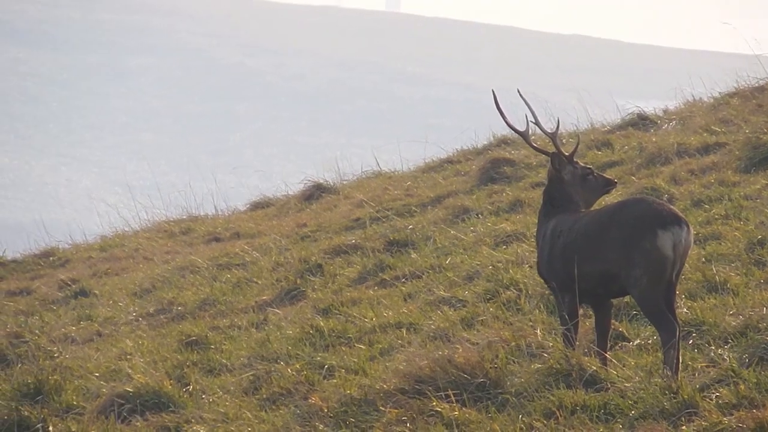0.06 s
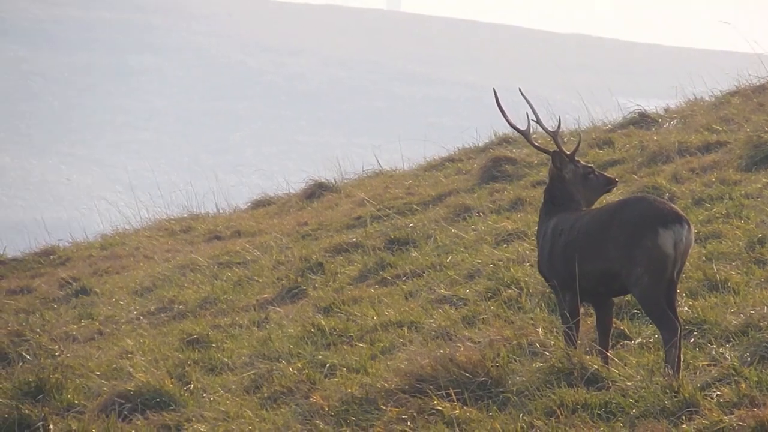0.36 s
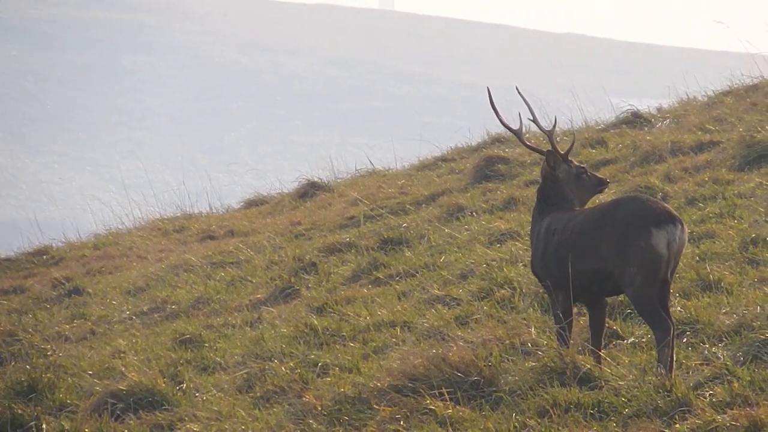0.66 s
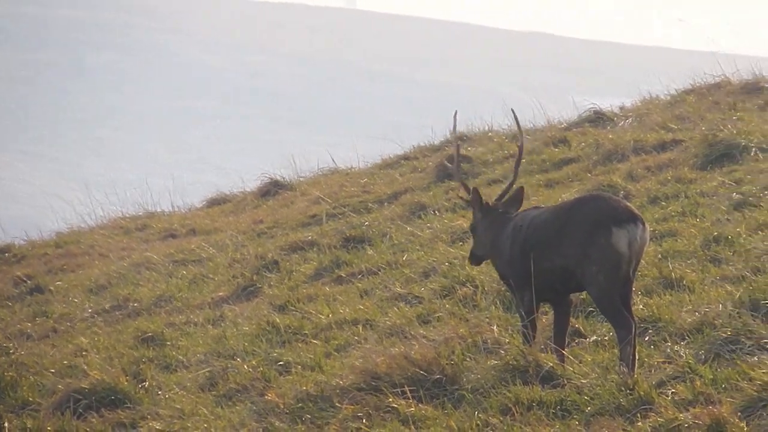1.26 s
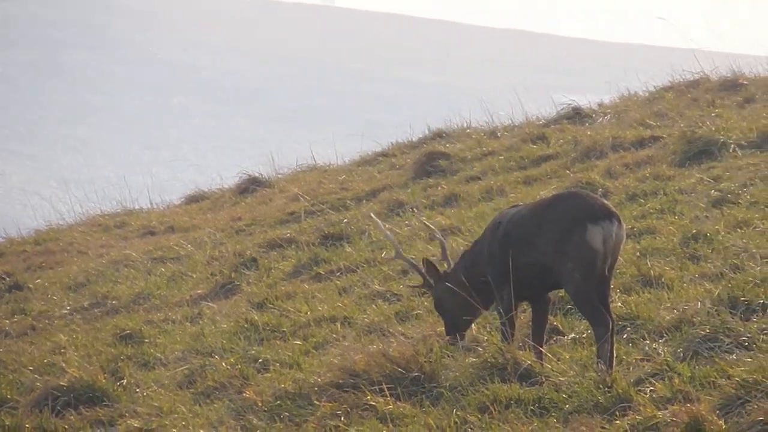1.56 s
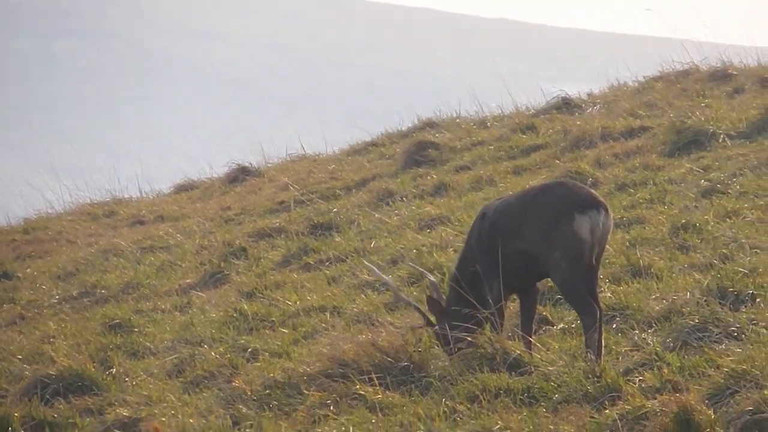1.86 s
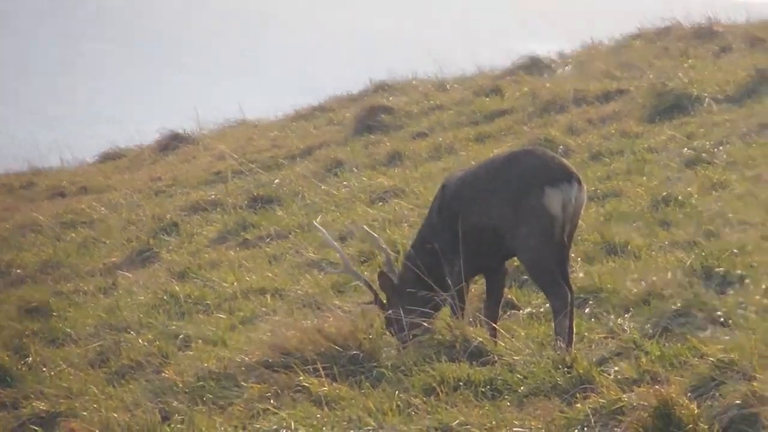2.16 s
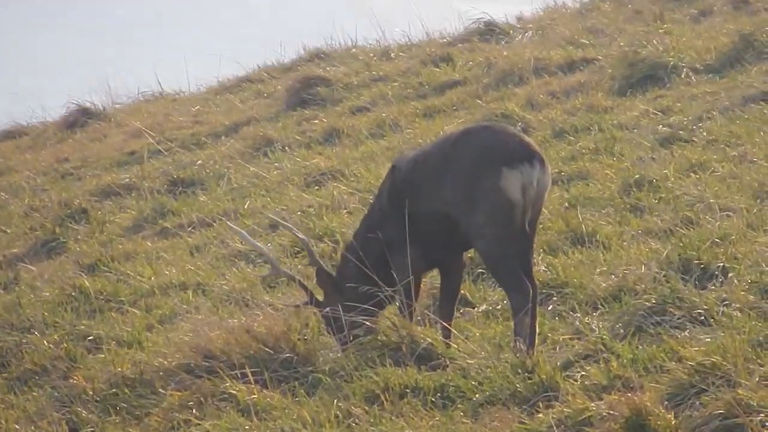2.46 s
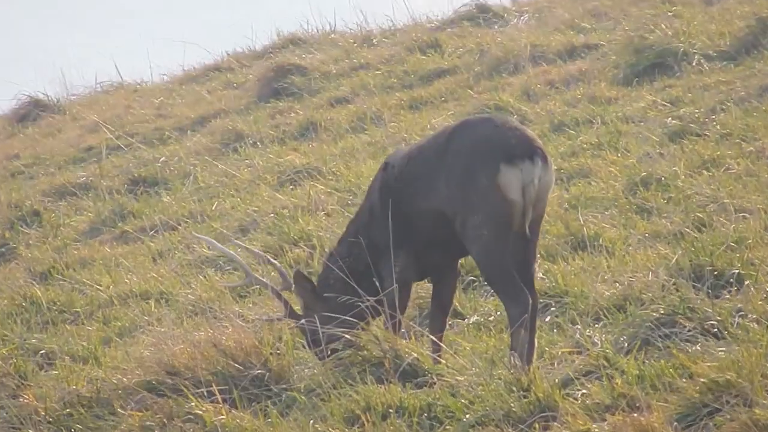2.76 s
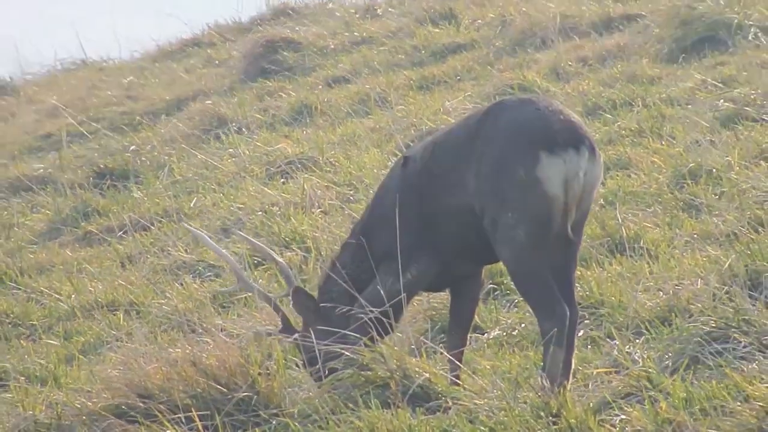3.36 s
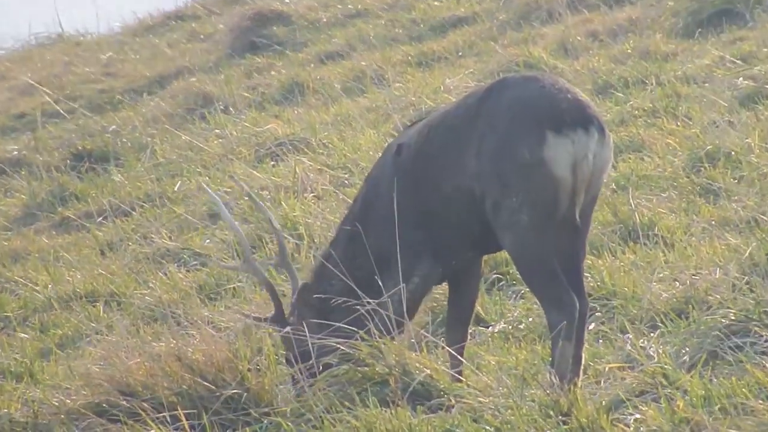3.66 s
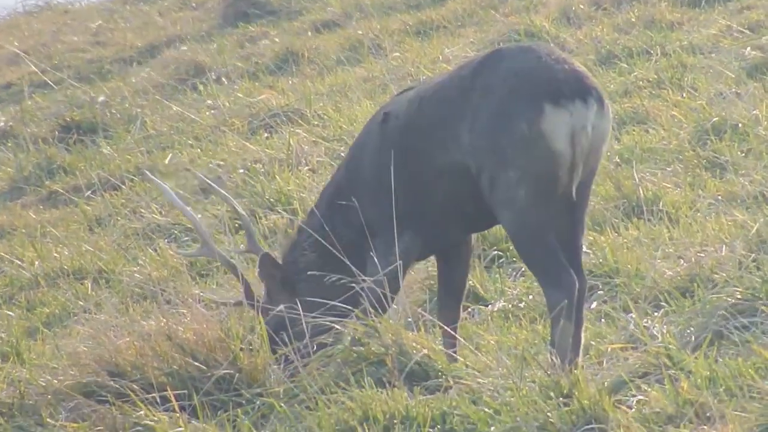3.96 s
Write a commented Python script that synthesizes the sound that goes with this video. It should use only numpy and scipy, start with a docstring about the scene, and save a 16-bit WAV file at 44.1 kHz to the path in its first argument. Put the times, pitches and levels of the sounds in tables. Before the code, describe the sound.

A distant stag whistles faintly, then a camera zoom motor buzzes close by.

```python
"""Air rushes softly over a quiet grassy hillside; a faint puff of wind touches the microphone and
a hand rubs the camera. From 0.3 s a distant stag gives one long rutting whistle, echoed by the slopes.
The camera starts to click under the hand, and wind buffets the microphone as the call ends. At 2 s a
finger slides onto the zoom lever; the motor buzzes on, its steps ringing the case, and the camera's
noise suppression dulls the background rush near 800 Hz. The strongest puffs come just before the end."""
import sys
import numpy as np
from scipy import signal
from scipy.fft import rfft, irfft
from scipy.io import wavfile

SR = 44100
rng = np.random.default_rng(int(sys.argv[2]) if len(sys.argv) > 2 else 0)


def waveform_to_disk(signal):
    """Save audio, clipped to [-1, 1], as 16-bit WAV at the path in sys.argv[1]."""
    frames = np.transpose(np.atleast_2d(signal))
    scaled = np.clip(frames, -1, 1) * 32767
    samples = np.round(scaled).astype(np.int16)
    wavfile.write(sys.argv[1], SR, samples)


N = 176400
T = np.arange(N) / SR


def from_db(db):
    """Turn decibels into a number to multiply by."""
    return 10 ** (np.asarray(db) / 20)


def unit_power(x):
    """Scale to an average power of 1."""
    return x / np.sqrt(np.mean(x ** 2) + 1e-20)


def over_time(rows):
    """Join the dots of a time table: one curve for each column after the first."""
    times, *columns = np.transpose(rows)
    return [np.interp(T, times, column) for column in columns]


def over_frequency(rows):
    """Join the dots of a frequency table, from bass to treble."""
    hz, value = np.transpose(rows)
    return np.interp(np.log(np.arange(N // 2 + 1) * SR / N + 1), np.log(hz), value)


def coloured(x, colour):
    """Give a sound a colour: make some frequencies louder and others softer."""
    return irfft(rfft(x) * from_db(over_frequency(colour)), N)


def noise(colour):
    """Steady noise of a given colour, with power 1."""
    return unit_power(coloured(rng.standard_normal(N), colour))


def drift(rate_hz):
    """A random wobble of size about 1, mostly slower than rate_hz."""
    hz = np.arange(N // 2 + 1) * SR / N
    return unit_power(irfft(rfft(rng.standard_normal(N)) / (1 + (hz / rate_hz) ** 2), N))


def pan(db):
    """Left and right gains, with the left louder by db."""
    return unit_power(from_db([[db / 2], [-db / 2]]))


def swell(peak_s, half_s, rise=1):
    """A bell-shaped rise and fall; a rise below 1 comes faster and leaves slower."""
    width_s = half_s * np.where(T < peak_s, rise, 2 - rise)
    return np.exp(-.5 * np.minimum(((T - peak_s) / width_s) ** 2, 100))


def ringing(colour):
    """A filter of this colour that rings only after a hit, never before (minimum phase)."""
    cepstrum = irfft(np.log(from_db(over_frequency(colour))), N)
    return np.exp(rfft(2 * cepstrum * (np.arange(N) < N // 2) * (np.arange(N) > 0)))


def burst(envelope, response):
    """A short, filtered noise with as much energy as its envelope (its loudness outline)."""
    filtered = irfft(rfft(envelope * rng.standard_normal(N)) * response, N)
    return unit_power(filtered) * np.sqrt(np.mean(envelope ** 2))


# colour of the open air: f/Hz, relative level/dB
AIR_COLOUR = [(30, -58.5), (80, -21.5), (160, -14), (300, -0.5), (580, 0), (850, -3), (1000, -7.5),
              (1090, -19), (1250, -9), (1700, -8.5), (2200, -7), (2800, -12), (3400, -10), (3900, -6),
              (4400, -15), (5200, -23), (9000, -23), (15500, -28.5)]
# how alike the air sounds left and right: f/Hz, likeness (1 = the same)
AIR_LIKENESS = [(100, .8), (600, 0.819), (1100, 0.336), (2000, 0.55), (4000, 0.9), (6000, 0.037),
                (15000, 0.04)]
# how the rush grows and eases: t/s, relative level/dB
AIR_LEVEL = [(0, -7.5), (.33, -1), (1.3, -0.5), (2.1, 0.5), (2.4, -1), (4.0, -1)]
# the camera's noise suppression while the zoom runs: f/Hz, level change/dB
ZOOM_NOISE_FILTER = [(200, 2.5), (600, 0.5), (730, -12.5), (880, -10), (1000, 5), (2000, -0.5)]

def air(level_db=-55, sway_db=.4264, filter_fade_s=.286):
    """A soft rush fades in; the camera's noise suppression dulls it near 800 Hz while the zoom runs."""
    alike = over_frequency(AIR_LIKENESS)
    shared = irfft(rfft(noise(AIR_COLOUR)) * np.sqrt((1 + alike) / 2), N)
    side = irfft(rfft(noise(AIR_COLOUR)) * np.sqrt((1 - alike) / 2), N)
    rush = np.array([shared + side, shared - side])
    filter_on = np.clip((T - ZOOM_START_S) / filter_fade_s, 0, 1)
    gain = from_db(level_db + over_time(AIR_LEVEL)[0] + sway_db * drift(7))
    return gain * ((1 - filter_on) * rush + filter_on * coloured(rush, ZOOM_NOISE_FILTER))


# puffs of wind: t/s, half length/s, level/dB, left minus right/dB
PUFFS = [(0.11, 0.0115, -63.5, 1.5), (1.325, 0.0138, -60, -3), (1.773, .007, -52, 7.5),
         (1.827, 0.0086, -53.5, -0.5), (1.909, 0.0039, -32.5, -18), (1.917, 0.0039, -26.5, -11.5),
         (1.929, 0.00501, -26, -10), (1.952, 0.00294, -30, 2), (1.967, 0.0081, -32, -5),
         (2.003, 0.00566, -37.5, -9), (2.032, 0.01007, -37, -4.5), (2.265, 0.01134, -50.5, -3),
         (2.383, 0.0086, -46.5, -12.5), (2.462, 0.00876, -41, 8.5), (3.184, 0.00313, -33.5, -9.5),
         (3.199, 0.00755, -40.5, -0.5), (3.221, 0.0096, -41.5, -17), (3.757, 0.0059, -28.5, -2.5),
         (3.767, 0.0039, -22.5, 23), (3.802, 0.0048, -16, -5), (3.817, 0.00638, -19, 1),
         (3.846, 0.00518, -13.5, 0), (3.862, .005, -19, -1.5), (3.879, 0.00497, -10.5, 3),
         (3.905, 0.00725, -29.5, -0.5), (3.94, 0.0097, -38, -7)]
# colours of a gentle puff and of a strong one: f/Hz, relative level/dB
GENTLE_PUFF = [(30, -38.5), (70, -17.5), (140, 3.5), (200, -3), (300, -0.5), (450, -17), (700, -37),
               (1100, -53), (2000, -69)]
STRONG_PUFF = [(30, -59), (70, -40), (150, -13), (230, -7), (320, 1.5), (420, 0.5), (480, -5), (610, -9.5),
               (750, -30), (950, -24.5), (1080, -35.5), (1300, -34.5), (2000, -68.5), (5000, -93.5)]

def wind(gentle_db=-45, strong_db=-20.5):
    """Swirls of air hit each microphone opening separately; stronger ones sound higher."""
    gentle, strong = over_frequency(GENTLE_PUFF), over_frequency(STRONG_PUFF)
    out = 0
    for peak_s, half_s, db, pan_db in PUFFS:
        force = np.clip((db - gentle_db) / (strong_db - gentle_db), 0, 1)
        response = from_db(force * strong + (1 - force) * gentle)
        envelope = swell(peak_s, half_s, rise=.737)
        puff = np.array([burst(envelope, response), burst(envelope, response)])
        out = out + from_db(db) * pan(pan_db) * puff
    return out


# rubs of the hand: t/s, half length/s, level/dB
RUBS = [(0.21, 0.0231, -57.5), (1.291, .035, -55)]
# colour of a rub: f/Hz, relative level/dB
RUB_COLOUR = [(60, -23.5), (250, -2.5), (700, 5.5), (1080, -12), (1350, -3), (2000, -15.5), (4000, -23),
              (6000, -45.5)]

def hand_rubs():
    """The hand brushes the camera body, making soft swells of noise."""
    return noise(RUB_COLOUR) * sum(from_db(db) * swell(peak_s, half_s) for peak_s, half_s, db in RUBS)


# the tune of the whistle: t/s, f/Hz
WHISTLE_PITCH = [(.35, 1235), (.41, 1275), (.46, 1480), (.53, 1529), (.66, 1562), (.8, 1577), (1.0, 1562),
                 (1.3, 1537), (1.58, 1496), (1.7, 1426), (1.785, 1360), (1.835, 1263), (1.92, 1236),
                 (2.03, 1210)]
# its loudness: t/s, main note level/dB, octave level/dB
WHISTLE_LEVELS = [(.33, -81, -90), (.395, -57.5, -80.5), (.44, -79, -92.5), (.53, -57, -67),
                  (.67, -53, -72), (.75, -59.5, -65.5), (.83, -78, -63), (.91, -57.5, -59.5),
                  (1.07, -57, -69.5), (1.19, -49.5, -65.5), (1.3, -56.5, -62.5), (1.41, -68, -71.5),
                  (1.49, -58, -66), (1.6, -61, -71.5), (1.72, -60, -72.5), (1.79, -62.5, -73),
                  (1.85, -53, -73), (1.94, -52, -67), (1.985, -55.5, -70.5), (2.04, -80, -82)]
# echoes off the slopes: delay/s, relative level/dB
ECHOES = [(.043, -15), (.097, -21), (.171, -23)]

def stag(waver=.00177, flutter_db=.88):
    """A nearly pure whistle with its octave leaps up, holds and sinks; the slopes echo it faintly."""
    hz = over_time(WHISTLE_PITCH)[0] * (1 + waver * drift(30.1))
    phase = 2 * np.pi * np.cumsum(hz) / SR
    call = 0
    for harmonic, db in enumerate(over_time(WHISTLE_LEVELS), start=1):
        gain = from_db(db + flutter_db * drift(13.7))
        call = call + gain * np.sqrt(2) * np.sin(harmonic * phase)
    return call + sum(from_db(db) * np.interp(T - delay_s, T, call, left=0) for delay_s, db in ECHOES)


# camera clicks: t/s, level/dB, left minus right/dB, time to fade by 60 dB/s, snap over rattle/dB
CLICKS = [(1.027, -27.5, 4, 0.024, -0.5), (1.891, -46.5, 1, 0.04, 0), (2.128, -39.5, 4.5, 0.2649, 2),
          (2.574, -33, 3.5, 0.0293, -10.5), (2.583, -40, 0, 0.0011, -4.5), (3.373, -44, 3.5, 0.0282, 2.5),
          (3.676, -31.5, 3, 0.03, -7), (3.776, -37, -4, 0.1481, -8.5)]
# colours of a click's first snap and of its rattle: f/Hz, relative level/dB
SNAP_COLOUR = [(60, -51), (350, -12.5), (700, -6.5), (950, 6), (1080, -2), (1250, 8), (1600, 6.5),
               (2200, -7.5), (3000, -3.5), (3900, -16.5), (4600, -31.5), (6000, -43), (12000, -67)]
RATTLE_COLOUR = [(60, -41.5), (250, -6.5), (480, -3), (750, -2.5), (950, 0), (1080, -7.5), (1220, 3),
                 (1520, 0.5), (1800, -9), (2800, -12), (4000, -21.5), (5500, -40.5), (12000, -65)]

def body_clicks(attack_s=.0009, snap_energy_s=.000667):
    """The plastic body clicks under the hand: a snap with a short rattle after it."""
    rattle_response = ringing(RATTLE_COLOUR)
    snap = unit_power(irfft(ringing(SNAP_COLOUR), N)) * np.sqrt(snap_energy_s * SR / N)
    out = 0
    for start_s, db, pan_db, fade_s, snap_db in CLICKS:
        age = np.maximum(T - start_s, 0)
        rise = 1 - np.exp(-age / attack_s)
        fall = from_db(-60 * np.minimum(age / fade_s, 2))
        click = burst(rise * fall, rattle_response) + from_db(snap_db) * np.roll(snap, int(start_s * SR))
        out = out + pan(pan_db) * from_db(db) * click
    return out


# colour of the finger's slide: f/Hz, relative level/dB
SLIDE_COLOUR = [(200, -9.5), (900, -14), (1080, -15), (1300, -1.5), (1800, -7.5), (2900, -5.5), (3250, -8),
                (3700, 2), (4400, -10), (5300, -23.5), (9000, -45.5)]

def finger_slide(level_db=-51.5):
    """A finger slides onto the zoom lever with a brief swish."""
    return from_db(level_db) * swell(peak_s=2.055, half_s=.0352) * noise(SLIDE_COLOUR)


# the notes at which the camera's case rings: f/Hz, width/Hz, relative level/dB
CASE_NOTES = [(367.4, 91.4, -11), (1018, 24.4, -15), (1172.3, 62, -13.5), (1468, 121.6, -11.5),
              (1886, 125.4, -7), (2426, 304, -6), (3109, 86, -3), (3482.2, 183, 1), (3793, 233.5, -1),
              (4133, 212, -8.5), (5040, 206, -11.5), (5866, 1300, -24)]

def camera_case(shaking, cutoff_hz=6050):
    """When shaken, the case rings at several notes at once and swallows the treble."""
    out = 0
    for hz, width_hz, db in CASE_NOTES:
        decay = np.exp(-np.pi * width_hz / SR)
        feed = np.array([1, 0, -1]) * (1 - decay ** 2) / 2
        feedback = [1, -2 * decay * np.cos(2 * np.pi * hz / SR), decay ** 2]
        out = from_db(db) * signal.lfilter(feed, feedback, shaking) - out  # neighbours get opposite signs
    return unit_power(signal.sosfilt(signal.butter(8, cutoff_hz, fs=SR, output="sos"), out))


def motor_ticks(steps_per_s=123.9, limp=.059, limp_s=.00015, jitter_s=.00011):
    """The motor limps: strong steps come late, weak ones early, with a softer tick in between."""
    spurt = (T > 2.141) & (T < 2.177)  # twice as fast while it gets going
    step_rate = steps_per_s * np.where(spurt, 2, 1)
    on_beat = np.flatnonzero(np.diff(np.floor(2 * np.cumsum(step_rate) / SR)))  # two ticks a step
    count = np.arange(len(on_beat))
    strong = (-1) ** (count // 2)  # +1 for a strong step, -1 for a weak one
    late_s = limp_s * strong + jitter_s * rng.standard_normal(len(count))
    tick_db = -12 * (count % 2) + 1.2 * rng.standard_normal(len(count))
    starts = np.clip(on_beat + (late_s * SR).astype(int), 0, N - 1)
    ticks = np.zeros(N)
    ticks[starts] = from_db(tick_db) * (1 + limp * strong)
    return ticks


# loudness of the zoom motor: t/s, level/dB
MOTOR_LEVEL = [(2.127, -58), (2.129, -39), (2.141, -40), (2.146, -40), (2.172, -42), (2.186, -41),
               (2.225, -46.5), (3.0, -46.5), (3.94, -47.5), (3.966, -40.5), (3.98, -47), (4.0, -42.5)]
ZOOM_START_S = MOTOR_LEVEL[0][0]
# colour of the gears' fine hiss: f/Hz, relative level/dB
GEAR_HISS = [(4000, -36), (6400, -2), (7400, -22), (8800, -8.5), (9900, 0.5), (10300, -2), (10700, -28),
             (15000, -39.5)]

def zoom_motor(grind_db=-2.5, grind_s=.001054, side_db=-4.5, hiss_db=-23.5, left_lag_s=.00004):
    """The motor's steps tick into the case; each drags a burst of gear noise after it."""
    ticks = motor_ticks()
    drag = .41 + signal.lfilter([1], [1, -np.exp(-1 / (grind_s * SR))], ticks)  # steady part + tails
    grind, side_grind = unit_power(drag * rng.standard_normal((2, N)))
    shared = camera_case(unit_power(ticks) + from_db(grind_db) * grind)
    treble_only = signal.butter(3, 3900, "high", fs=SR, output="sos")
    side = from_db(side_db) * signal.sosfilt(treble_only, camera_case(side_grind))  # widens the sound
    left, right = np.interp(T - left_lag_s, T, shared + side), shared - side
    buzz = pan(db=-1) * np.array([left, right])
    hiss = from_db(hiss_db) * np.array([noise(GEAR_HISS), noise(GEAR_HISS)])
    return from_db(over_time(MOTOR_LEVEL)[0]) * (T > ZOOM_START_S) * (buzz + hiss)


def scene():
    """The hillside and the far stag, with wind and camera noise close by."""
    return air() + wind() + hand_rubs() + stag() + body_clicks() + finger_slide() + zoom_motor()


def record(dry):
    """Cut away the highest treble, above 15500 Hz."""
    return signal.sosfiltfilt(signal.ellip(10, .05, 70, 15500, fs=SR, output="sos"), dry)


dry = scene()
out = record(dry)
waveform_to_disk(out)
```